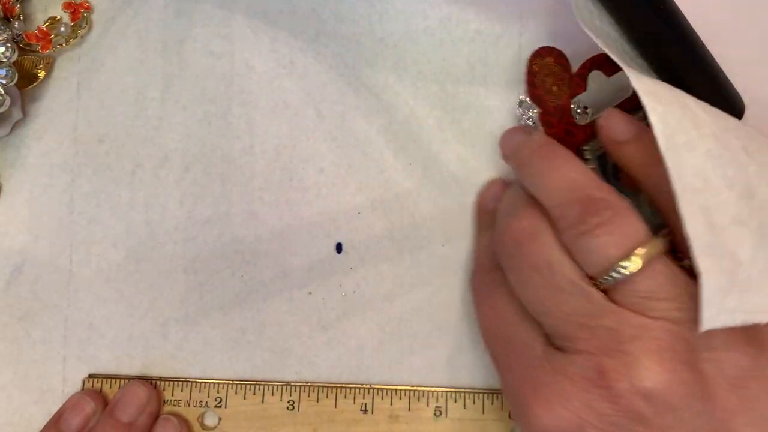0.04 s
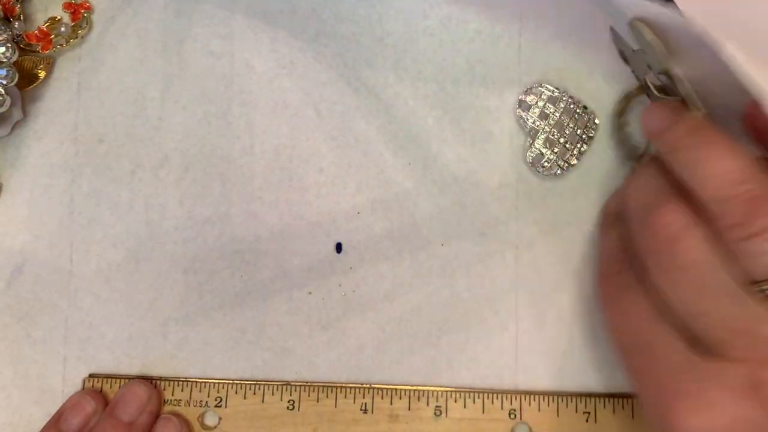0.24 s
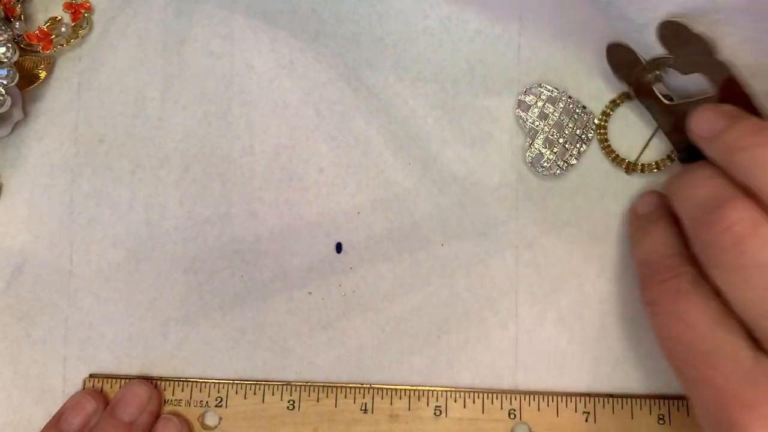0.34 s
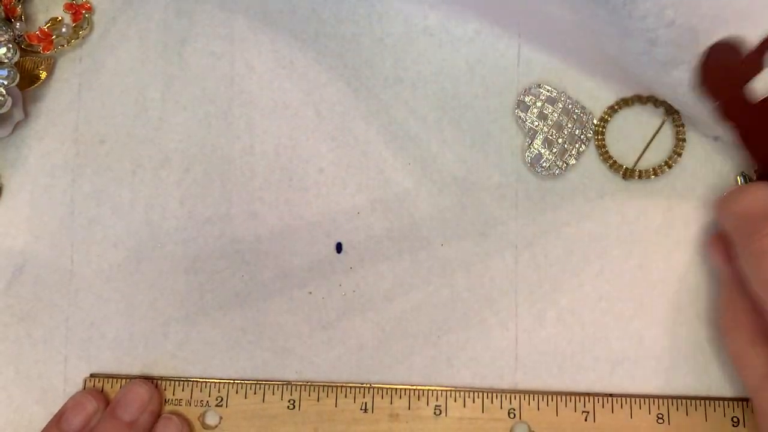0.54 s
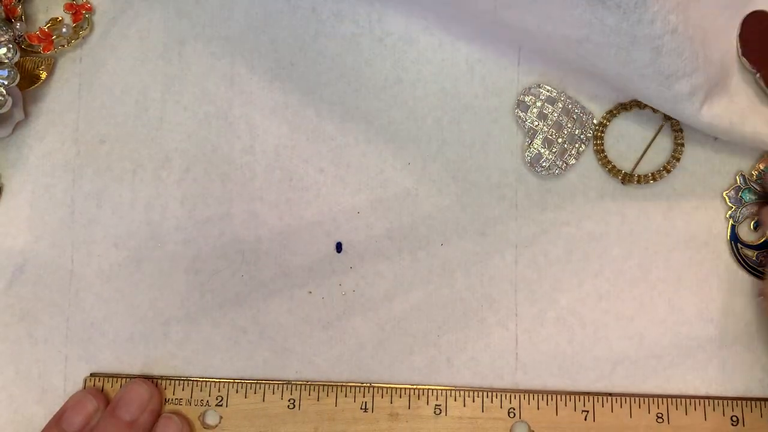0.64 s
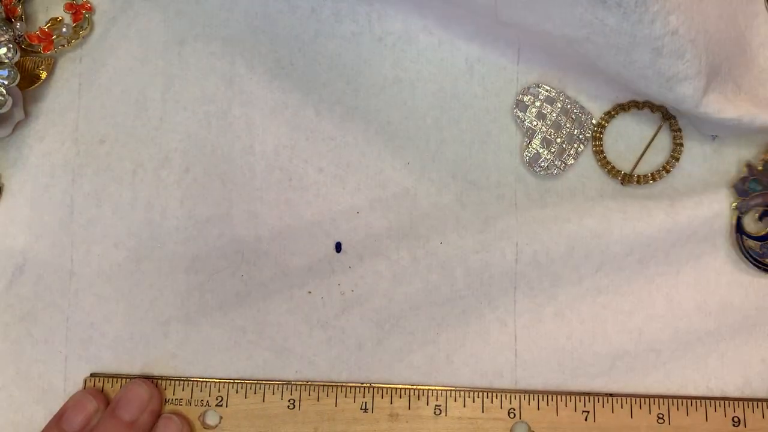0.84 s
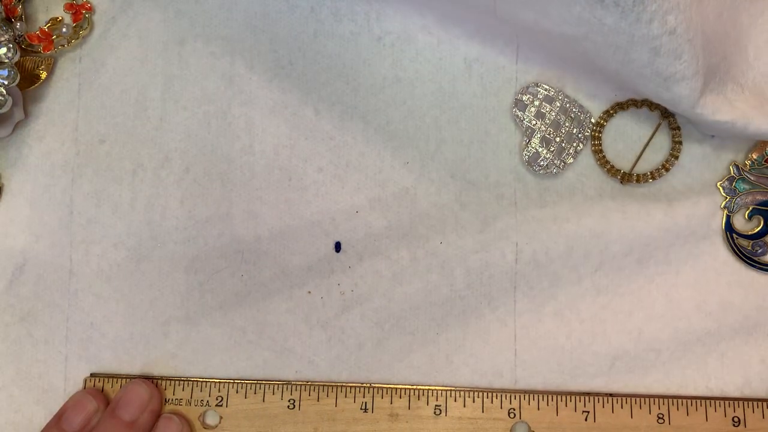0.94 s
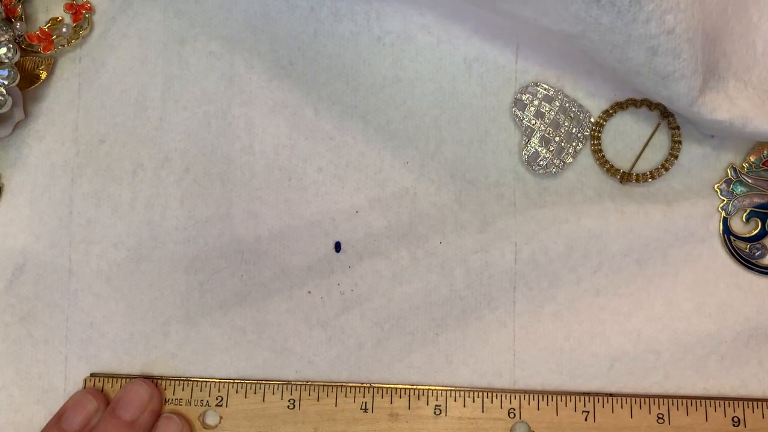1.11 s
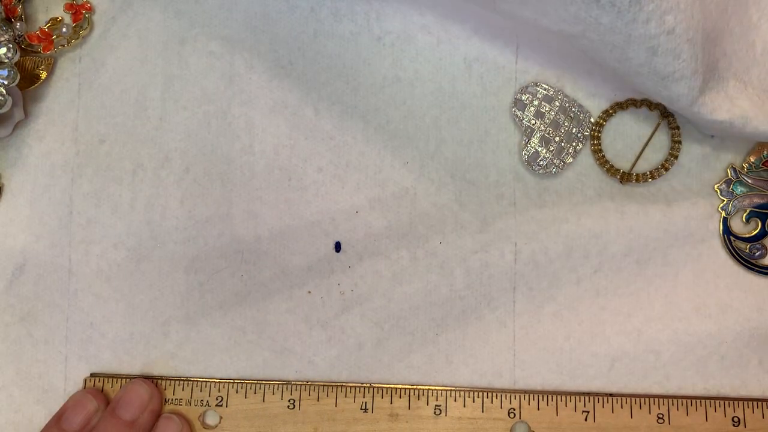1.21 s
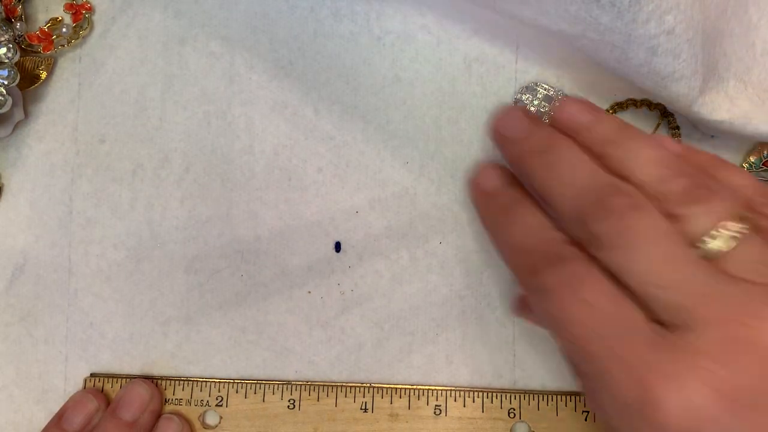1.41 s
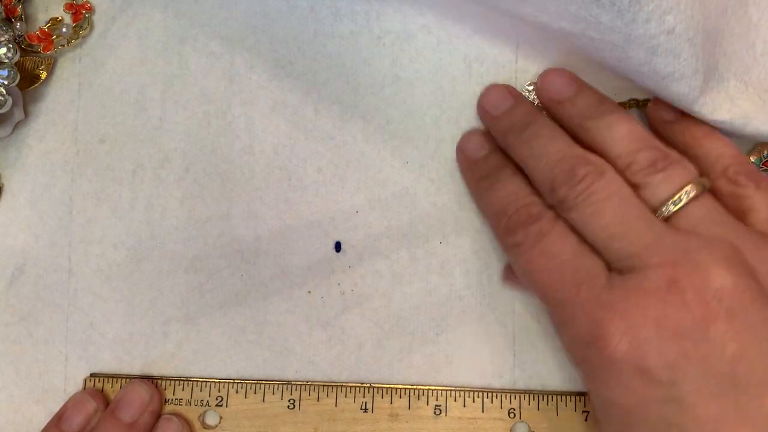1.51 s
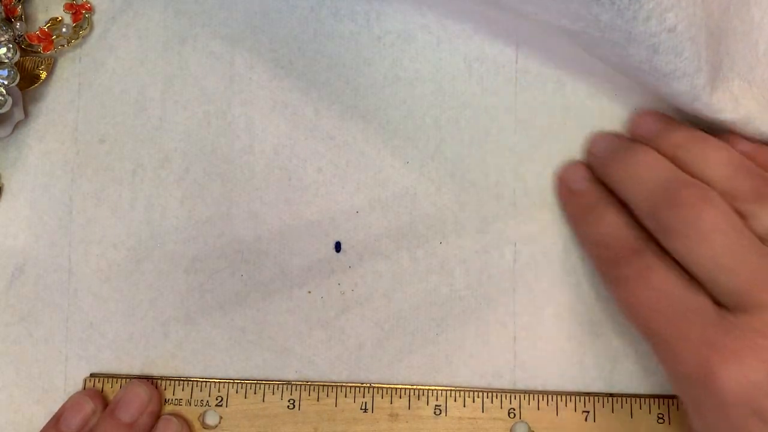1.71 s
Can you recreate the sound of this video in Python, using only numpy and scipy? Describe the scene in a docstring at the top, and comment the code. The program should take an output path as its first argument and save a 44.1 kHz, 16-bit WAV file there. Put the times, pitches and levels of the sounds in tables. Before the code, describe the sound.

Small metal brooches scrape and clink as a hand sweeps them over a cloth-covered table, close up in a small room. Bright clinks and thin pin pings peak around 0.3 to 0.4 seconds. At about 0.5 seconds one hard knock rings briefly through the table and room. Lighter clatter continues until 1.2 seconds. After a short pause, the hand slides back with a faint hiss from 1.6 seconds.

```python
"""A small room, a cloth-covered table, a stereo microphone up close. A hand sweeps metal brooches along:
their edges catch and scrape, the pieces clink and bump, and a thin pin pings over the dull rub of the
cloth. One hard knock sets the table and the room ringing. After a last clatter and a short pause
the hand slides back over the jewellery with a fine hiss."""
import sys
import numpy as np
from scipy import signal
from scipy.fft import rfft, irfft
from scipy.io import wavfile

SR = 44100
rng = np.random.default_rng(int(sys.argv[2]) if len(sys.argv) > 2 else 0)


def pcm_store(signal):
    """Save signal as 16-bit PCM."""
    levels = np.round(np.clip(np.atleast_2d(signal), -1, 1) * 32767)
    wavfile.write(sys.argv[1], SR, levels.astype(np.int16).T)


N = 77175
TIME = np.arange(N) / SR

# Metal meeting metal, and at 0.0872 s a soft tap with a low ring. Each row: start in seconds, click level in
# dB, ring pitch in Hz, ring level in dB.
CLINK_HITS = [(0.0235, -40, 5700, -40), (0.0693, -53, 10500, -44), (0.0872, -52, 1678, -38),
              (0.1432, -58, 7700, -33), (0.205, -29, 2870, -34.5), (.215, -38, 7780, -24),
              (.274, -41, 6460, -44), (.295, -41, 7450, -32), (.3185, -19, 3653, -26.5),
              (.322, -15, 3780, -23.5), (.382, -22.5, 7750, -30), (0.4231, -19.5, 7660, -32),
              (0.443, -31, 11500, -35), (0.527, -25.5, 5800, -46), (0.558, -26, 6700, -32),
              (.631, -36, 7520, -30), (.689, -35.5, 10500, -30.5), (0.733, -32, 9980, -30),
              (0.7913, -30, 7030, -36.5), (0.7989, -29.5, 11000, -38), (.807, -31.5, 6760, -47),
              (0.9233, -25, 7500, -27.5), (1.014, -40, 3440, -38), (1.043, -35, 7540, -41),
              (1.0851, -42, 8200, -47), (1.1394, -38.5, 3940, -38), (1.1565, -36, 7600, -51),
              (1.1646, -32.5, 3650, -33.5), (1.174, -45, 5680, -40.5), (1.180, -37, 7180, -49),
              (1.2124, -39, 3790, -44), (1.6315, -49, 14500, -36.5)]
# Strikes on the pin. Each row: start in seconds, level in dB.
PIN_STRIKES = [(0.237, -33), (.2455, -32.5), (0.3343, -29), (0.4296, -17.5), (0.4415, -21)]
# Pieces bumping the table, and at 1.577 s the hand. Each row: start in seconds, level in dB, centre pitch in
# Hz.
TABLE_BUMPS = [(.069, -37.5, 346), (.277, -32, 1193), (0.296, -31.5, 850), (.323, -27.5, 301),
               (.397, -29, 1215), (0.623, -24, 1895), (1.139, -39, 297), (1.141, -42, 1465),
               (1.159, -40, 278), (1.577, -48.5, 145.4)]
# Faders for the sweep. Each row: time in seconds, metal scrape in dB, table rub in dB.
SWEEP_FADERS = [(0.054, -45.5, -57), (0.11, -41.5, -48), (0.2, -39, -51.5), (0.253, -30.5, -45.5),
                (.35, -41.5, -39.5), (.41, -37, -42.5), (.54, -40, -44.5), (0.634, -29.5, -36.5),
                (0.679, -44.5, -42), (.765, -31, -42), (0.817, -44, -49.5), (0.888, -42, -42),
                (1.031, -45, -44), (1.075, -60, -51), (1.13, -61, -56), (1.168, -47.5, -42),
                (1.281, -79, -59.5), (1.52, -100, -81.5), (1.588, -79, -60), (1.75, -55, -65.5)]
# Fader for the hand sliding back. Each row: time in seconds, level in dB.
RETURN_FADER = [(1.53, -91), (1.555, -60), (1.6, -63), (1.64, -47), (1.75, -48.5)]
# The ring of the sliding pieces. Each row: pitch in Hz, relative level in dB.
BROOCH_MODES = [(3020, -1.5), (3700, -2.5), (4350, 3.5), (5650, 1), (6950, -1.5), (7620, -1.5),
                (10050, -0.5), (11050, -4.5), (12400, -3.5), (14060, -1), (15350, -6)]
# Resonances. Each row: pitch in Hz, relative level in dB, seconds to fall 60 dB.
PIN_MODES = [(14025, -3, .05), (14089, -4, .05), (14780, 0, .018), (15600, 1, .026)]
TABLE_MODES = [(161.5, -16, 0.2), (195, -14, 0.18), (359.5, -2, 0.062), (511, -11, 0.059), (599, -6, 0.036),
               (950, -6.5, 0.016), (1315, -2, 0.028), (1584, 2.5, 0.028), (1967, -1.5, 0.024),
               (2500, 3, 0.016), (3020, 4, 0.017), (3820, -2.5, 0.0091)]
BRUSHED_MODES = [(6440, -2.5, .02), (12000, 2.5, .03)]  # jewellery under the returning hand
# Tone curves. Each row: frequency in Hz, relative level in dB.
CLICK_EQ = [(300, -17), (2400, -23.5), (3600, 13), (8000, 3.5), (16000, 1.5)]  # bright metal attack
GRIT_EQ = [(500, -7), (2400, -6), (3800, 4), (8000, 4.5), (12000, -11)]  # catching edges
RASP_EQ = [(150, -20.5), (500, 0.5), (900, -3), (1500, 0.5), (2400, -5), (3600, -3), (6000, -6.5)]  # dragged cloth
RUB_EQ = [(25, -24.5), (50, -0.5), (125, -5.5), (160, 6), (215, -1.5), (420, -7.5), (750, -19),
          (3000, -55.5)]  # table rumble
HISS_EQ = [(500, -12), (2000, -2.5), (4600, -8.5), (7000, 1), (10000, 3.5), (14400, 3), (16000, 4)]  # sliding skin
ROOM_TONE_EQ = [(25, -8.5), (120, 1), (400, -25), (1500, -35), (16000, -44.5)]  # low, quiet air
# Reverb length. Each row: frequency in Hz, seconds to fall 60 dB.
ROOM_DECAY = [(150, 0.61), (1500, 0.67), (4000, 0.19), (16000, 0.38)]
# Reverb width. Each row: frequency in Hz, left-right likeness (1 is mono).
ROOM_LIKENESS = [(250, 1), (480, 0.22)]
# The mic's two ports. Each row: frequency in Hz, left phase lead in radians, left over right in dB.
MIC_PORTS = [(0, -0.5, -.5), (420, 1, -3), (1400, 1, -3), (3750, 1.5, 0), (6594, 6, 0), (16360, 21, 0)]

KNOCK_S, BEND_S = .5283, .0022  # moment of the blow; travel time of a 1 kHz bending wave


def clinks(click_decay_s=.0017, ring_t60_s=.081, detune=.027):
    """Metal hits metal: a bright click, a brief cluster of modes and one clear note that rings on. One early
    row is a soft tap with a low ring."""
    out, t = np.zeros(N), TIME[:N // 10]
    mean_db = np.mean([row[1] for row in CLINK_HITS])
    snap = 2 * (np.exp(-t / click_decay_s) - np.exp(-10 * t / click_decay_s))
    for s, click_db, hz, ring_db in CLINK_HITS:
        db_per_octave = .13 * (click_db - mean_db)  # harder hits are brighter
        eq = [(f, db + db_per_octave * np.log2(f)) for f, db in CLICK_EQ]
        click = colour(rng.standard_normal(len(t)), eq) * snap
        near_hz = hz * (1 + detune * rng.standard_normal(size=(6, 1)))
        ring = cluster(near_hz, t) * np.exp(-t / .01) + np.sin(2 * np.pi * hz * t) / 2
        add(out, s, amp(click_db) * click + amp(ring_db - 60 * t / ring_t60_s) * ring)
    return out


def scrape():
    """Metal edges catch on each other: grit and the modes it plucks, over the rasp of the cloth."""
    grit = amp(-5) * colour(catches(per_s=1100, spread_db=6), GRIT_EQ)
    rings = amp(-3) * ringing([(hz, db, .013) for hz, db in BROOCH_MODES], per_s=150, spread_db=6)
    rasp = amp(-2.5) * colour(catches(per_s=2500, spread_db=-2), RASP_EQ)
    metal_gain = fader([(s, db) for s, db, _ in SWEEP_FADERS]) * flutter(hz=80, depth_db=3.2)
    # The rasp rides mostly with the scrape, partly with the rub.
    rasp_gain = fader([(s, .78 * scrape_db + .22 * rub_db) for s, scrape_db, rub_db in SWEEP_FADERS])
    return (grit + rings) * metal_gain + rasp * rasp_gain


def knock(gain_db=-7, rise_s=.0018):
    """A hard blow on the table: the high modes arrive first, the low ones boom on."""
    out = np.zeros(N)
    for hz, db, t60 in TABLE_MODES:
        t = np.maximum(TIME - KNOCK_S - BEND_S * np.sqrt(1000 / hz), 0)
        envelope = amp(gain_db + db - 60 * t / t60) * (1 - np.exp(-t / rise_s))
        out += envelope * np.sin(2 * np.pi * hz * t)
    return out


def pin():
    """A thin pin pings very high, the same modes on every hit; a close pair beats and lasts longest."""
    out, t = np.zeros(N), TIME[:N // 10]
    for s, hit_db in PIN_STRIKES:
        for hz, db, t60 in PIN_MODES:
            add(out, s, amp(hit_db + db - 60 * t / t60) * np.sin(2 * np.pi * (hz * t + rng.random())))
    return out


def bumps(spread_octaves=.8):
    """Pieces, and once the hand, tap the table through the cloth: hollow, heavily damped modes around a centre
    pitch."""
    out, t = np.zeros(N), TIME[:4096]
    for s, db, hz in TABLE_BUMPS:
        octaves = spread_octaves * (np.linspace(-1, 1, 6) + .15 * rng.standard_normal(size=6))
        thud = cluster(hz * 2 ** octaves[:, None], t)
        decay_s = .0054 * np.sqrt(1000 / hz)
        add(out, s, amp(db) * thud * (1 - np.exp(-t / .00026)) * np.exp(-t / decay_s))
    return out


def rub():
    """The hand rumbles on the table through the cloth."""
    return colour(rng.standard_normal(N), RUB_EQ) * fader([(s, db) for s, _, db in SWEEP_FADERS])


def hand_return():
    """Skin slides back over cloth and metal: fine hiss with a thin ring."""
    hiss = colour(catches(per_s=4000, spread_db=3.5), HISS_EQ)
    ring = amp(-8) * ringing(BRUSHED_MODES, per_s=770, spread_db=6)
    return (hiss + ring) * fader(RETURN_FADER)


def knock_tail(band_hz=(281.8, 2600), t60_s=.42):
    """The knock's dense, dull, grainy tail dies away in the room."""
    out = np.zeros(N)
    band = signal.butter(3, band_hz, "band", fs=SR, output="sos")
    grain = unit(signal.sosfilt(band, catches(per_s=1100, spread_db=.5)))
    add(out, KNOCK_S + BEND_S, grain * amp(-24.5 - 60 * TIME / t60_s))
    return out


def reverb(x, predelay_s):
    """The room's diffuse tail: shorter in the treble, mono in the bass."""
    reflections = rng.choice([-1., 1.], (2, SR)) * (rng.random((2, SR)) < .1)
    hz, t, bands = signal.stft(reflections, SR, nperseg=256)
    likeness = read(ROOM_LIKENESS, hz)[:, None]
    bands[1] = likeness * bands[0] + np.sqrt(1 - likeness ** 2) * bands[1]
    decay = amp(-60 * t / read(ROOM_DECAY, hz)[:, None])
    tail = signal.istft(bands * decay, SR, nperseg=256)[1][:, :SR]
    tail *= np.clip(TIME[:SR] / predelay_s - 1, 0, 1)
    return signal.fftconvolve(x[None], tail / np.linalg.norm(tail[0]), axes=1)[:, :N]


def room_tone():
    """A faint, steady bed of low noise."""
    return amp(-65) * colour(rng.standard_normal(N), ROOM_TONE_EQ)


def stereo_mic(x):
    """A close sound reaches the two ports with a lag and a level difference."""
    f = np.fft.rfftfreq(2 * N, 1 / SR)
    hz, lead, balance_db = np.transpose(MIC_PORTS)
    left = amp(np.interp(f, hz, balance_db) / 2) * np.exp(.5j * np.interp(f, hz, lead))
    return irfft(rfft(x, 2 * N) * np.array([left, 1 / left]))[:, :N]


def catches(per_s, spread_db):
    """Tiny random impulses of uneven size, as in stick-slip friction."""
    size = amp(spread_db * np.minimum(rng.exponential(1, N), 3))
    return unit(size * rng.choice([-1, 1], N) * (rng.random(N) < per_s / SR))


def ringing(modes, per_s, spread_db):
    """Friction shimmer: each mode is plucked by its own stream of catches."""
    out, t = np.zeros(N), TIME[:N // 8]
    for hz, db, t60 in modes:
        ping = amp(-60 * t / t60) * np.sin(2 * np.pi * hz * t)
        out += amp(db) * unit(signal.fftconvolve(catches(per_s, spread_db), ping)[:N])
    return unit(out)


def cluster(hz, t):
    """A stack of sines in random phase, at rms 1."""
    return unit(np.sin(2 * np.pi * (hz * t + rng.random(hz.shape))).sum(0))


def flutter(hz, depth_db):
    """A gain that wavers at random, mostly slower than hz."""
    slow = irfft(rfft(rng.standard_normal(N)) / (1 + (np.fft.rfftfreq(N, 1 / SR) / hz) ** 4), N)
    return unit(amp(depth_db * unit(slow)))


def colour(x, eq):
    """Puts a tone curve on a signal, at rms 1."""
    gain = amp(read(eq, np.fft.rfftfreq(len(x), 1 / SR)))
    return unit(irfft(rfft(x) * gain, len(x)))


def read(points, hz):
    """Reads a curve on a log-frequency axis."""
    f, value = np.transpose(points)
    return np.interp(np.log(hz + 1), np.log(f + 1), value)


def fader(points):
    """Gain over time from points in seconds and dB."""
    return amp(np.interp(TIME, *np.transpose(points)))


def add(mix, s, sound):
    """Drops a sound into the mix at s seconds."""
    part = mix[round(s * SR):][:len(sound)]
    part += sound[:len(part)]


def amp(db):
    """Decibels to gain."""
    return 10 ** (np.asarray(db) / 20)


def unit(x):
    """Scales to rms 1."""
    return x / np.sqrt(np.mean(x ** 2) + 1e-20)


def scene():
    """The mix: close handling and the knock, each with its own reverb send, over room tone."""
    close = clinks() + pin() + bumps() + knock_tail() + scrape() + rub() + hand_return()
    direct = stereo_mic(close + room_tone())
    blow = knock()
    boom = stereo_mic(blow) + amp(-12.5) * reverb(blow, predelay_s=.0049)
    nudge_right = amp([[-.25], [.25]])
    return direct + amp(-11) * reverb(close, predelay_s=.0013) + boom * nudge_right


def record(dry, low_cut_hz=51, high_cut_hz=15950):
    """A gentle low cut and a steep top cut on the mix."""
    cut = signal.sosfilt(signal.butter(2, low_cut_hz, "high", fs=SR, output="sos"), dry)
    lowpass = signal.firwin(401, high_cut_hz, window=("kaiser", 9), fs=SR)
    return signal.oaconvolve(cut, lowpass[None], "same")


dry = scene()
out = record(dry)
pcm_store(out)
```